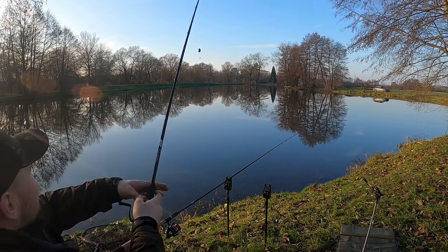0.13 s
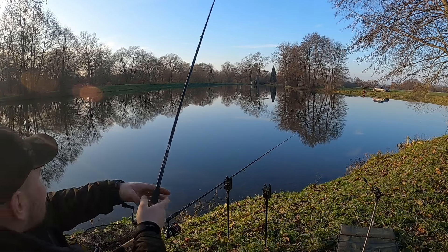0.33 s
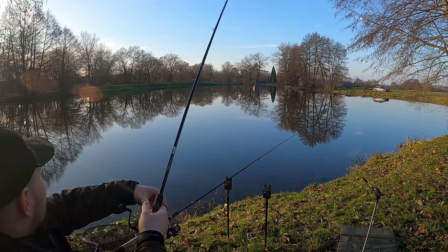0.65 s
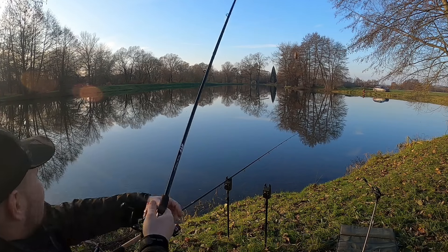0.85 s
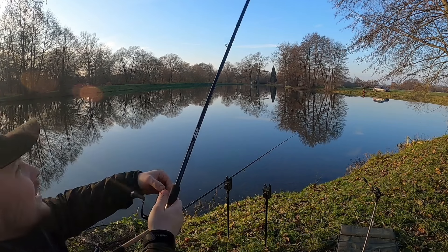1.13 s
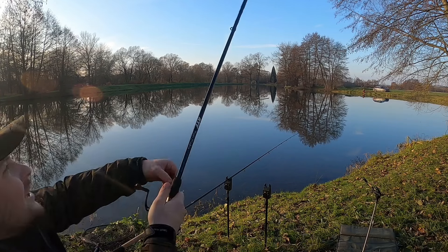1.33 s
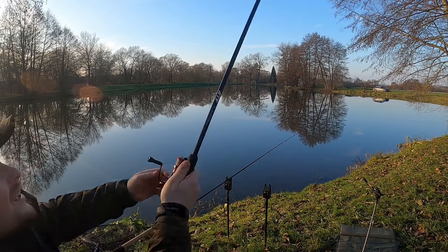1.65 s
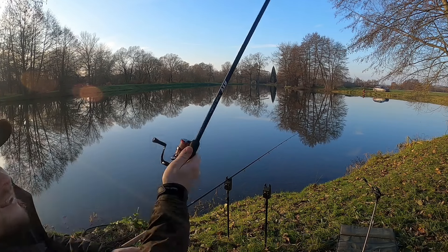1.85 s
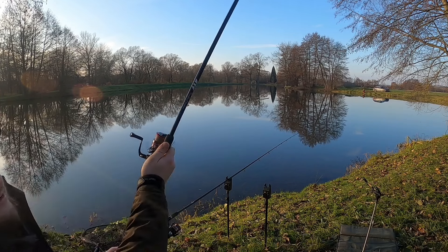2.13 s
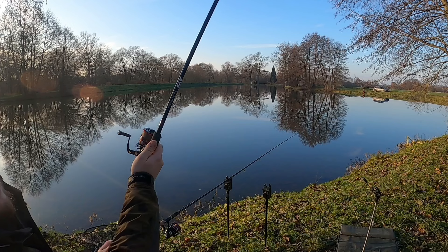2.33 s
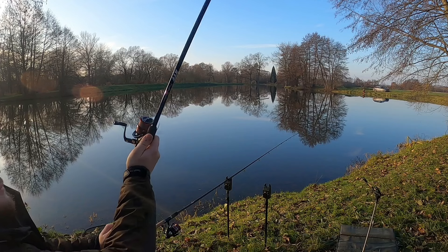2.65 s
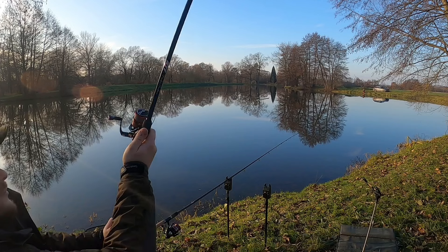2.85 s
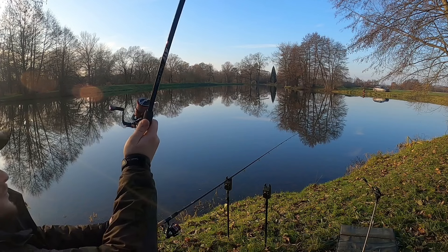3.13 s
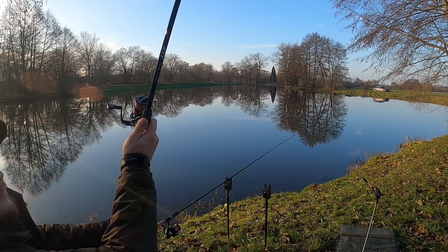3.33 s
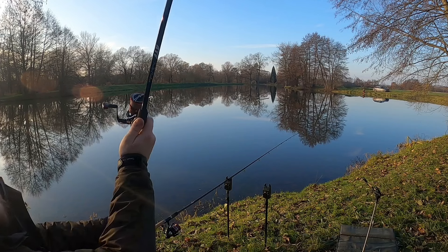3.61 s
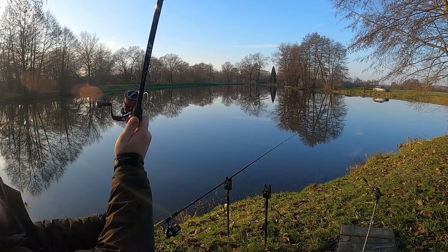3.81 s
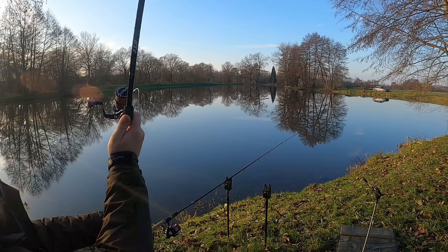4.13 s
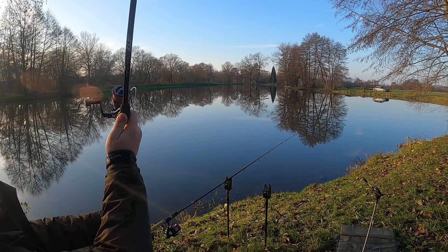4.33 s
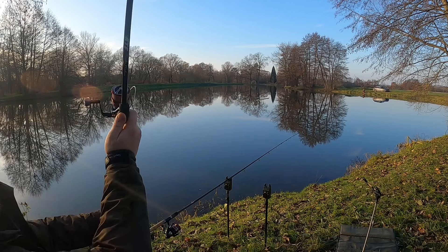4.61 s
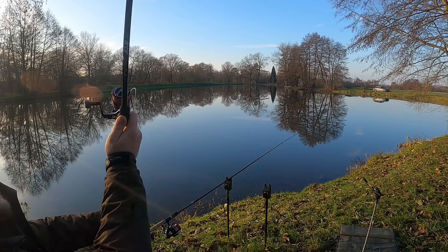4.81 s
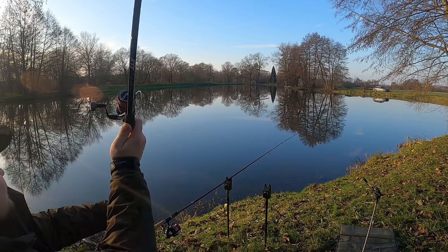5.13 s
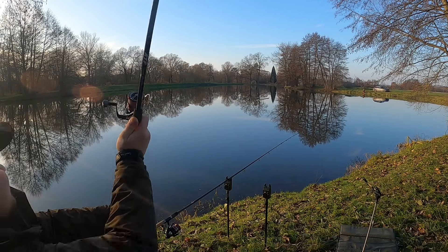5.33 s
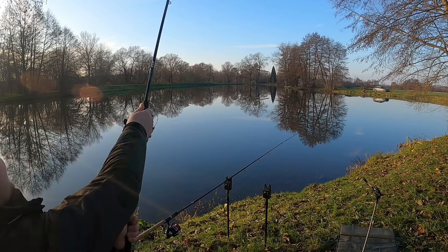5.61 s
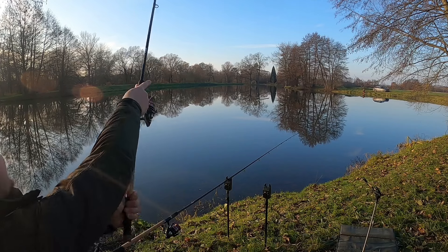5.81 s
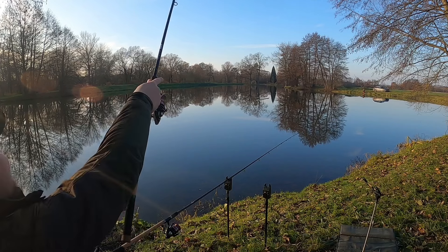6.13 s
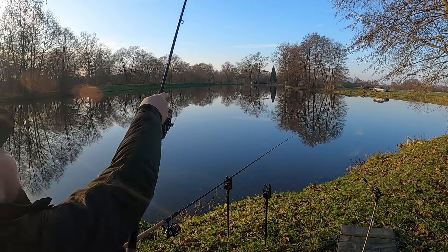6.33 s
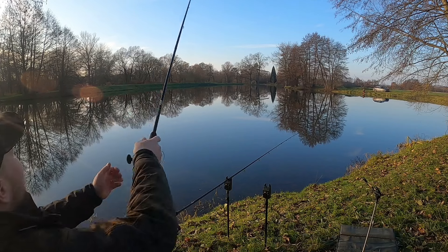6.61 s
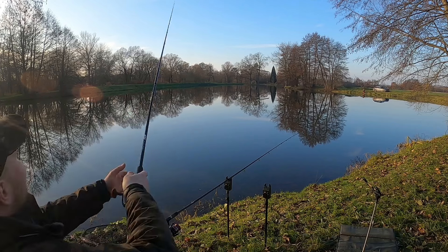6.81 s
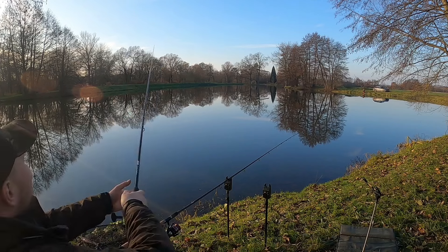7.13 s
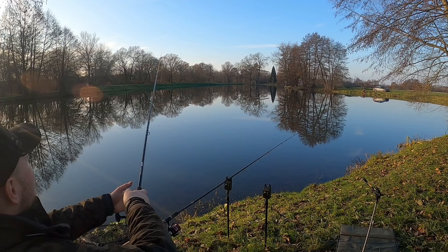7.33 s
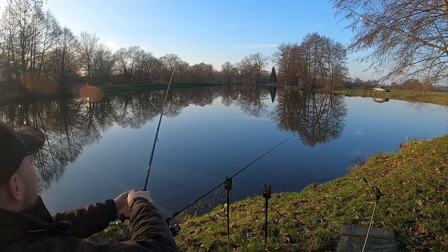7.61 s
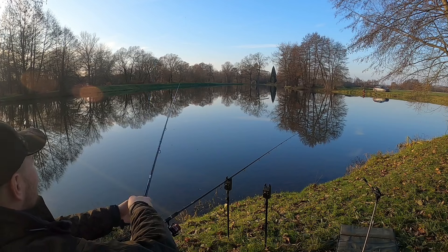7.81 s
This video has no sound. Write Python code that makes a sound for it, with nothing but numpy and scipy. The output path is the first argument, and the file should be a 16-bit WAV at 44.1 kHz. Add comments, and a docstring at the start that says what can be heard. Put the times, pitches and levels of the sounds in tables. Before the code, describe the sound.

Hands knock on a fishing rod before a swishing cast and fading hiss of line, with a far engine humming steadily.

```python
"""On the bank of a still pond, an angler winds in some line, swings the rod and casts.
The reel clicks as a small catch snaps over its teeth, and hands knock, scuff and squeak on the rod.
The rod swishes through the air, then line whispers off the spool, fading as the weight slows.
A jacket rustles with each arm movement. Far off, an engine idles under the soft rush of open country."""
import sys
import numpy as np
from scipy import signal
from scipy.fft import rfft, irfft
from scipy.io import wavfile
from scipy.ndimage import uniform_filter1d, map_coordinates

SR = 44100
rng = np.random.default_rng(int(sys.argv[2]) if len(sys.argv) > 2 else 0)


def digitize_waveform(pressure):
    """Quantize a signal to 16-bit integers and store it at the path in sys.argv[1].

    Rows of a 2-D input are taken as channels; values are limited to [-1, 1].
    """
    field = np.atleast_2d(pressure).T
    bounded = np.clip(field, -1, 1)
    quanta = np.round(bounded * 32767).astype(np.int16)
    wavfile.write(sys.argv[1], SR, quanta)


N = 351036
T = np.arange(N) / SR

# the tones the spool rings at when line touches it: (pitch [Hz], width [Hz], level [dB])
SPOOL_TONES = [(7200, 200, 0), (7570, 320, -2)]


def reel(bounce_s=.0008, bounce_db=-4.5):
    """A catch snaps over each tooth, bounces once and rings its spring; loose line flicks the spool."""
    # one click a tooth as the spool is turned by hand: (time [s], level [dB])
    teeth = [(1.3665, -29.5), (1.3933, -28.5), (1.4197, -29), (1.4378, -28.5), (1.4513, -31), (1.4613, -28),
             (1.4692, -28), (1.477, -28), (1.485, -32), (1.494, -28), (1.503, -27), (1.5133, -26),
             (1.525, -26), (1.5376, -25), (1.5536, -26.5), (1.5745, -27)]
    # the tone of the catch's snap: (frequency [Hz], level [dB])
    snap_colour = [(1000, -21), (2800, -6), (4500, -4), (6300, -3.5), (7000, -10), (8000, -10),
                   (8600, -4.5), (10000, -5.5), (11000, -8), (14000, -10), (15800, -12)]
    # the tones of the spring and the turning part: (pitch [Hz], width [Hz], level [dB])
    spring_tones = [(3380, 320, 4), (4500, 570, 6), (5300, 520, -5), (7540, 180, 8), (9540, 720, -1),
                    (12300, 1400, -5)]
    # line flicking over the spool's rim: (time [s], level [dB])
    flick_times = [(.6155, -39), (.7215, -38), (7.059, -47), (7.432, -51), (7.562, -45), (7.645, -47)]
    bounces = [(s + bounce_s, db + bounce_db) for s, db in teeth]
    catch = snaps(teeth + bounces, decay_s=.00034, buzz_db=-19.5, buzz_s=.009)
    flicks = snaps(flick_times, decay_s=.001, buzz_db=-24, buzz_s=.006)
    spring = sum(undb(db) * band(catch, hz, width) for hz, width, db in spring_tones)
    clicks = colour(catch, snap_colour) + undb(-8) * spring
    return clicks + undb(-15) * flicks + undb(14) * ring(flicks, SPOOL_TONES)


def snaps(rows, decay_s, buzz_db, buzz_s):
    """Hard parts meet with a sharp crack, and loose parts buzz faintly after it."""
    out, t = np.zeros(N), T[:4096]
    for s, db in rows:
        crack = noise(len(t)) * np.exp(-t / decay_s)
        crack *= np.sqrt(decay_s * SR / 2 / np.sum(crack ** 2))  # equal force gives equal energy
        buzz = undb(buzz_db) * noise(len(t)) * np.exp(-t / buzz_s)
        add(out, s, undb(db) * (crack + buzz))
    return out


def running_line(release_s=5.935, slowing_s=1.3, start_coils_per_s=130):
    """Coils of line brush the spool and ring it; the line ticks and fizzes through the rod's rings."""
    # the tone of line sliding in the rings: (frequency [Hz], level [dB])
    slide_colour = [(1500, -22), (4000, -4), (6500, 0), (8400, -5), (9600, 1.5), (11500, -7), (13500, -7),
                    (14600, -23), (15500, -28)]
    # the airy fizz of fast line: (frequency [Hz], level [dB])
    fizz_colour = [(1500, -8), (5000, 2), (8500, -6), (12000, -13), (14000, -10), (15500, -13)]
    since = np.maximum(T - release_s, 0)
    speed = np.exp(-since / slowing_s)
    coils_per_s = start_coils_per_s * speed
    turn = 2 * np.pi * np.cumsum(coils_per_s * (1 + 0.088 * drift(25))) / SR
    pulse = 1 + (.24 + .22 * (1 - speed)) * np.sin(turn)  # slower coils are looser and slap more
    friction = noise() + undb(-7) * grains(rate=coils_per_s * 4, spread_db=1)
    slide = unit(colour(friction * pulse, slide_colour))
    fizz = unit(colour(noise() * pulse, fizz_colour)) * speed ** 1.8
    # the hiss brightens for a moment, then the spool's ring briefly thins
    bright = unit(steep_band(noise() * pulse, hz=10200, width=3500)) * swell(7.03, 0.3)
    thinning_db = -7 * swell(7.27, 0.12)
    pressure = (0.16 + 0.84 * speed ** 1.6) * undb(drift(45) + thinning_db)
    spool = unit(ring(noise() * pulse, SPOOL_TONES))
    wander = np.cumsum(1 + 0.0044 * drift(40))  # the pitch wanders as line travels round the rim
    spool = pressure * map_coordinates(spool, [wander], mode="mirror")
    # a thin whistle sets in once the line runs steadily
    whistle = unit(band(noise() * pulse, hz=13030, width=130))
    whistle *= np.sqrt(speed) * np.clip((T - 6.2) / .2, 0, 1)
    hiss = undb(-65.5) * slide + undb(-63) * fizz + undb(-69) * bright
    tones = undb(-59) * spool + undb(-81) * whistle
    fade_in = np.minimum(since / .04, 1)
    return (hiss + tones) * undb(0.27 * drift(26)) * fade_in


def swish(fastest_hz=1500):
    """The rod leaves swirls of air behind it: the faster it moves, the higher and louder they sound."""
    # the swing of the rod's tip: (time [s], speed [share of the fastest])
    swing = [(5.35, 0), (5.5, 0.51), (5.59, 0.88), (5.68, 0.82), (5.78, 1), (5.88, 0.28), (5.98, 0)]
    speed = curve(swing)
    swirls = unit(steep_band(noise(), fastest_hz, width=1400))
    gliding = np.interp(np.cumsum(speed), np.arange(N), swirls)
    return gliding * speed ** 3 * undb(-49)


def knocks(glide_cycles=1.49):
    """A knock bends the hollow rod and rings it; high waves arrive first, so the pitch falls."""
    # hands and fittings hitting the rod:
    # (time [s], level [dB], last pitch [Hz], first pitch [Hz], rise [s], decay [s], ring level [dB])
    hits = [(0.182, -21.5, 180, 237, 0.00055, 0.0092, -28.5),
            (0.8198, -21, 500, 1720, 0.000092, 0.00098, -35), (.829, -33, 378, 1300, .00016, 0.0031, -53),
            (.864, -36, 340, 1140, .00018, 0.0027, -52),
            (0.9929, -23.5, 794, 3200, 0.000062, 0.00046, -31.5),
            (1.818, -29, 1060, 3700, 0.00013, .00095, -52), (1.8593, -34, 560, 1750, 0.00011, 0.0015, -45),
            (1.88, -28, 445, 1550, 0.0002, 0.0021, -47), (1.9645, -15, 190, 900, 0.0024, 0.0031, -27.5),
            (6.5555, -37, 760, 1100, .0004, 0.0029, -52)]
    # the tones of the hollow rod: (pitch [Hz], level [dB], decay [s])
    rod_tones = [(365, -2, 0.0049), (513, -7.5, .004), (765, -2, 0.0029), (1190, -2.5, 0.0017),
                 (1500, -17, .003)]
    out, t = np.zeros(N), T[:4096]
    rod = sum(undb(db) * np.sin(2 * np.pi * hz * t) * np.exp(-t / decay) for hz, db, decay in rod_tones)
    for s, db, last_hz, first_hz, rise, decay, ring_db in hits:
        hz = last_hz + (first_hz - last_hz) * np.exp(-t * first_hz / glide_cycles)
        loudness = (1 - np.exp(-t / rise)) * np.exp(-t / decay)
        blow = np.sin(2 * np.pi * np.cumsum(hz) / SR) * loudness
        add(out, s, undb(db) * blow / abs(blow).max() + undb(ring_db) * rod)
    return out


def clacks():
    """The reel's metal parts chatter under the fingers for an instant and ring on."""
    # bursts of chatter: (time [s], level [dB], length [s], brightest frequency [Hz])
    bursts = [(0.8406, -37, 0.0067, 3200), (0.849, -38, 0.0083, 4400), (0.862, -47, 0.0034, 3000),
              (.8683, -40, 0.0017, 5200), (0.883, -43, 0.0027, 3700)]
    # the tones of the metal: (pitch [Hz], width [Hz], level [dB])
    metal_tones = [(1950, 300, -7), (2400, 300, 4), (3150, 480, -0.5), (3970, 400, 0), (4550, 260, -1),
                   (5950, 800, -4), (7540, 270, 0), (9900, 500, 4)]
    out, t = np.zeros(N), T[:4096]
    for s, burst_db, length, bright_hz in bursts:
        burst = noise(len(t)) * np.exp(-(t / length) ** 4)
        chatter = band(burst, bright_hz, width=bright_hz)
        metal = sum(undb(db) * band(chatter, hz, width) for hz, width, db in metal_tones)
        add(out, s, undb(burst_db) * metal * np.sqrt(length * SR / np.sum(metal ** 2)))
    return out


def scuffs(width_share=0.79):
    """Skin rubs on the reel and the grip in short bursts of hiss."""
    # finger rubs: (time [s], level [dB], length [s], centre frequency [Hz])
    rubs = [(.111, -49, 0.0039, 5000), (.1165, -41.5, 0.0031, 3300), (0.355, -45, 0.023, 1610),
            (0.82, -38, 0.0018, 2800), (0.9905, -49, 0.0047, 3300), (5.793, -52, 0.057, 9900)]
    out = np.zeros(N)
    for s, db, length, hz in rubs:
        progress = T[:8192] / length
        loudness = np.exp(-4 * (progress - .5) ** 2) * np.minimum(10 * progress, 1)
        rub = steep_band(noise(len(progress)), hz, width_share * hz) * loudness
        add(out, s, undb(db) * rub * np.sqrt(length * SR / np.sum(rub ** 2)))
    return out


def squeak(unevenness=0.13, upper_width_hz=450):
    """The grip sticks and slips in jerks that ring it; its upper tone climbs as the finger tightens."""
    # the grip slipping during the cast: (time [s], slips [per s], level [dB], upper tone [Hz])
    slipping = [(5.425, 760, -73, 5260), (5.428, 890, -38.5, 5200), (5.44, 980, -45, 5750),
                (5.448, 830, -52, 6150), (5.458, 1050, -70, 6250)]
    # the grip's steady tones: (pitch [Hz], width [Hz], level [dB])
    grip_tones = [(2050, 400, 5.5), (3050, 800, -5), (5300, 500, -11)]
    slips_per_s = curve(slipping) * (1 + unevenness * drift(1500))
    jerks = np.diff(np.floor(np.cumsum(slips_per_s) / SR), prepend=0)
    body = sum(undb(db) * steep_band(jerks, hz, width) for hz, width, db in grip_tones)
    # each jerk starts a fading tone that follows the climbing pitch
    turn = np.exp(2j * np.pi * np.cumsum(curve(slipping, column=3)) / SR)
    fading = signal.lfilter([1], [1, -np.exp(-np.pi * upper_width_hz / SR)], jerks / turn)
    upper = colour((turn * fading).imag, [(2500, -20), (5000, 0)])
    sounding = (T > slipping[0][0]) & (T < slipping[-1][0])
    return (unit(body) + undb(-5) * unit(upper)) * undb(curve(slipping, column=2)) * sounding


def sleeve_folds(crinkle_db=-15, crinkle_s=0.0055, lead_s=.003, decay_cycles=0.3):
    """A stiff fold of the sleeve flips over with a pop, and the cloth around it crinkles."""
    # single folds flipping: (time [s], level [dB], pitch [Hz])
    folds = [(1.834, -37, 1100), (1.87, -37, 1000), (5.474, -29.5, 1800), (5.5585, -33, 1300),
             (5.5691, -29, 950), (5.5726, -27, 895), (5.5821, -31, 1100), (5.584, -30, 600),
             (5.5987, -38, 1400), (5.614, -29, 1100), (5.6698, -26.5, 1090), (5.835, -35, 800),
             (5.8417, -33, 1100), (5.844, -32, 600), (6.5612, -32, 1900), (6.6108, -36, 1200),
             (6.704, -35, 1200), (6.7874, -32, 1090), (6.8364, -36, 1100), (6.874, -35, 1050),
             (6.889, -33, 1200), (6.8955, -33, 1500), (6.9151, -34, 1000), (6.9582, -32.5, 1500),
             (7.244, -42, 1050)]
    out, t = np.zeros(N), T[:2048] - lead_s
    for s, db, hz in folds:
        pop = np.sin(2 * np.pi * hz * t) * np.exp(-abs(hz * t) / decay_cycles)
        crinkle = unit(band(noise(len(t)), hz, hz / 2)) * np.exp(-abs(t) / crinkle_s) * (t > 0)
        add(out, s - lead_s, undb(db) * (pop / pop.max() + undb(crinkle_db) * crinkle))
    return out


def jacket(rise_share=0.42):
    """As the arms move, cloth creases in many tiny pops and hisses as it slides over itself."""
    # arm movements: (time of the peak [s], length [s], creasing level [dB], sliding level [dB])
    moves = [(0.0, 0.1, -49.5, -56), (0.71, 0.25, -56.5, -53.5), (0.85, 0.054, -47, -64),
             (1.033, 0.077, -56, -59), (1.255, 0.95, -70.5, -60.5), (1.878, 0.22, -50.5, -58.5),
             (1.998, 0.16, -55.5, -56.5), (3.507, 0.036, -84, -58.5), (4.922, 0.066, -84, -63),
             (5.462, 0.063, -48, -55.5), (5.592, 0.13, -47.5, -49.5), (5.816, 0.17, -53.5, -54),
             (6.608, 0.31, -54.5, -60.5), (6.887, 0.06, -51, -68)]
    # the tone of creasing cloth: (frequency [Hz], level [dB])
    crease_colour = [(150, -7), (350, 1), (700, 1.5), (1400, -2.5), (2300, -4), (4000, -16), (8000, -34.5),
                     (14000, -47.5)]
    # the tone of sliding cloth: (frequency [Hz], level [dB])
    slide_colour = [(300, -8.5), (1200, 1), (3000, 4.5), (5000, 1), (7500, -5), (9000, -10), (12000, -18),
                    (15500, -34)]
    crackle = unit(colour(grains(rate=1800, spread_db=3), crease_colour)) * undb(1.5 * drift(70))
    pops = unit(colour(grains(rate=120, spread_db=1), crease_colour))
    hiss = unit(colour(grains(rate=9000, spread_db=2.5), slide_colour)) * undb(drift(40))
    creasing = sliding = 0
    for s, length, crease_db, slide_db in moves:
        # each movement builds to a sharp peak, then eases off
        from_peak = np.maximum((s - T) / rise_share, (T - s) / (1 - rise_share)) / length
        power = np.exp(-np.minimum(from_peak, 20))
        creasing += power * undb(crease_db) ** 2
        sliding += power * undb(slide_db) ** 2
    return (crackle + undb(-14) * pops) * np.sqrt(creasing) + hiss * np.sqrt(sliding)


def engine(firings_per_cycle=8, start_db=-30.5, growth_db_per_s=0.21):
    """The exhaust of a far engine hums and slowly grows louder; its lowest tones waver the most."""
    # the idling speed: (time [s], firings [per s])
    idle = [(0, 53.7), (1.25, 53.9), (2.2, 53.15), (3.0, 53.7), (3.7, 52.65), (4.9, 53.05), (7.96, 53.1)]
    # exhaust tones; unequal cylinders add those besides 8 and 16: (multiple of the cycle, level [dB])
    exhaust_tones = [(6, -30.5), (8, 3), (12, -14), (13, -12.5), (14, -17.5), (16, 0.5), (18, -25),
                     (20, -27), (28, -23), (34, -27.5)]
    # brief dips in the hum: (time [s], depth for the lowest tones [dB])
    dips = [(.23, 6.5), (.68, 2.5), (1.112, 2), (2.2, 8), (4.05, 4.5), (4.75, 3.5), (5.38, 4), (6.8, 3.5)]
    cycles_per_s = curve(idle) / firings_per_cycle * (1 + 0.0015 * drift(5))
    turn = 2 * np.pi * np.cumsum(cycles_per_s) / SR
    waver_db = 0.94 * drift(6.7) - sum(depth * swell(s, .065) for s, depth in dips)
    hum = np.zeros(N)
    for multiple, db in exhaust_tones:
        share = 1 if multiple <= firings_per_cycle else 0.15
        hum += undb(db + share * waver_db) * np.sin(multiple * turn)
    return unit(hum) * undb(start_db + growth_db_per_s * T)


def country(level_db=-40.5):
    """A soft, nearly even rush comes from far across the open land."""
    # the tone of the rush: (frequency [Hz], level [dB])
    rush_colour = [(12, -23.5), (38, 2), (125, 0), (160, -7), (220, -8.5), (310, -16), (400, -21.5),
                   (600, -20), (880, -28.5), (1250, -20.5), (2500, -26), (4000, -36), (7500, -44),
                   (9500, -60), (14000, -94)]
    return unit(colour(noise(), rush_colour)) * undb(level_db + 0.074 * drift(3.4))


def undb(db):
    """Turn decibels into a number to multiply a sound by."""
    return 10 ** (np.asarray(db) / 20)


def unit(x):
    """Scale a sound to an average (rms) level of one."""
    return x / np.sqrt(np.mean(x ** 2))


def curve(rows, column=1):
    """One column of a table, joined by straight lines in time."""
    rows = np.array(rows)
    return np.interp(T, rows[:, 0], rows[:, column])


def swell(s, length):
    """A smooth hump of height one around time s."""
    return np.exp(-((T - s) / length) ** 2)


def noise(size=N):
    """White noise: an even hiss."""
    return rng.standard_normal(size)


def drift(rate):
    """A smooth random wobble of about size one, with `rate` new values a second."""
    hold = max(int(SR / rate), 1)
    steps = np.repeat(noise(N // hold + 1), hold)
    return 1.41 * uniform_filter1d(uniform_filter1d(steps, hold), hold)[:N]


def grains(rate, spread_db):
    """Tiny random taps of unequal size, about `rate` a second."""
    taps = (rng.random(N) < rate / SR) * noise()
    return unit(taps * undb(spread_db * np.clip(noise(), -2, 2)))


def colour(x, points):
    """Shape a sound's tone with (frequency [Hz], level [dB]) points."""
    hz, db = np.transpose(points)
    frequencies = np.maximum(np.fft.rfftfreq(len(x), 1 / SR), 1)
    gain = undb(np.interp(np.log(frequencies), np.log(hz), db))
    return irfft(rfft(x) * gain, len(x))


def band(x, hz, width):
    """Keep the sound near one pitch; a narrower band rings longer."""
    angle = 2 * np.pi * hz / SR
    damping = np.tan(np.pi * width / SR)
    return signal.lfilter([damping, 0, -damping], [1 + damping, -2 * np.cos(angle), 1 - damping], x + 1e-18)


def steep_band(x, hz, width):
    """The same band twice, so less gets through at the sides."""
    return band(band(x, hz, width), hz, width)


def ring(x, tones):
    """Ring an object at several tones; neighbouring tones swing opposite ways."""
    return sum((-1) ** k * undb(db) * band(x, hz, width) for k, (hz, width, db) in enumerate(tones))


def add(out, s, x):
    """Mix a short sound in at time s."""
    start = int(s * SR)
    out[start:start + len(x)] += x[:N - start]


def scene():
    """All the sounds together in the open air, with no echo."""
    # skin and cloth soak up the treble of what the hands do: (frequency [Hz], level [dB])
    muffle = [(7000, -2.5), (10000, -14), (15000, -19)]
    handling = colour(knocks() + scuffs() + clacks() + sleeve_folds() + squeak(), muffle)
    background = engine() + country()
    return (background + jacket() + swish() + running_line() + reel() + handling)[None]


def record(dry):
    """Cut the very highest treble, above 15800 Hz."""
    return signal.sosfilt(signal.ellip(10, .2, 80, 15800, fs=SR, output="sos"), dry)


dry = scene()
out = record(dry)
digitize_waveform(out)
```